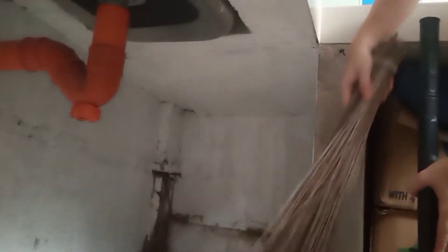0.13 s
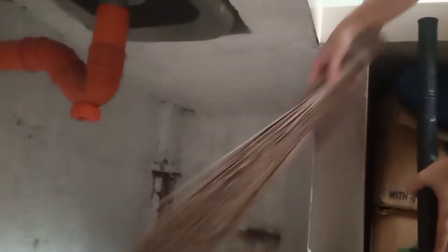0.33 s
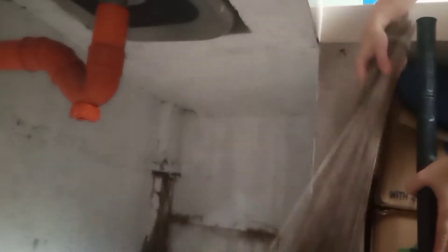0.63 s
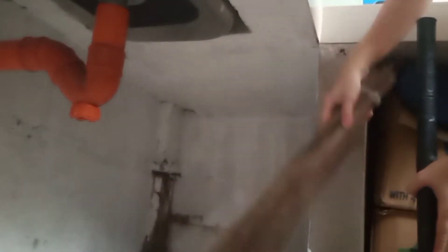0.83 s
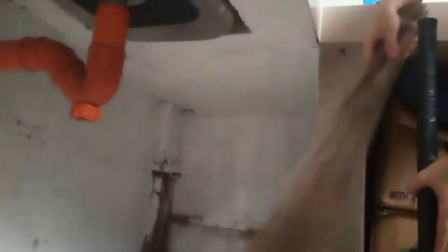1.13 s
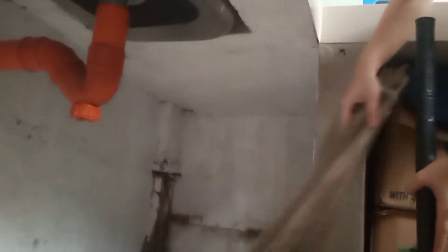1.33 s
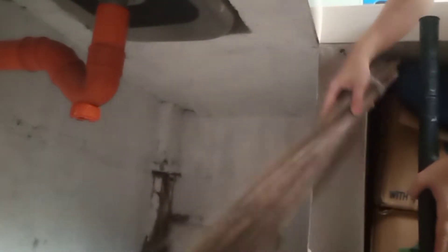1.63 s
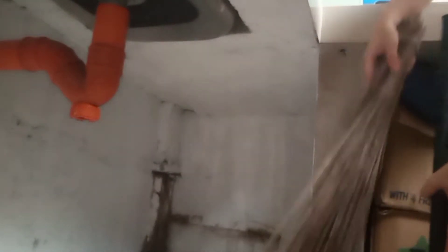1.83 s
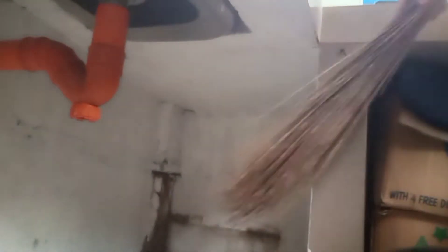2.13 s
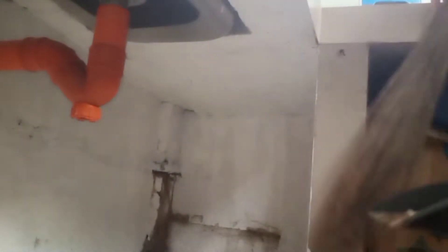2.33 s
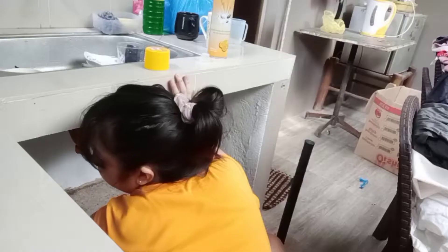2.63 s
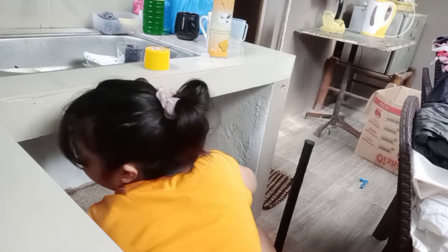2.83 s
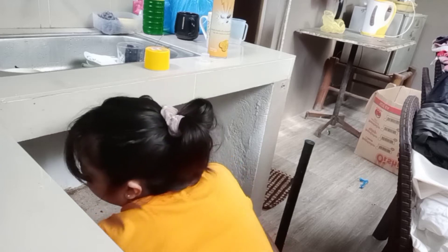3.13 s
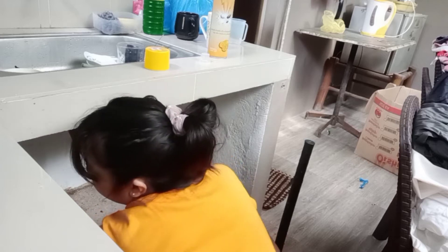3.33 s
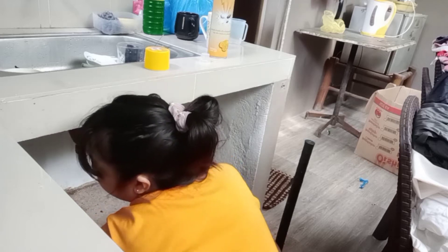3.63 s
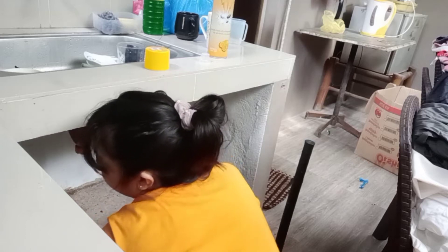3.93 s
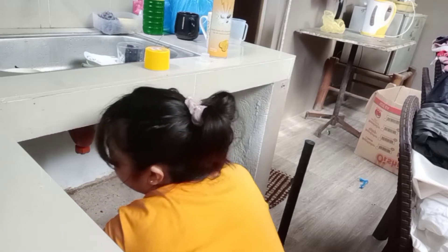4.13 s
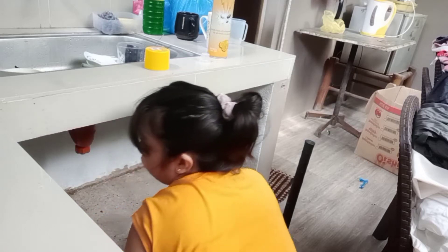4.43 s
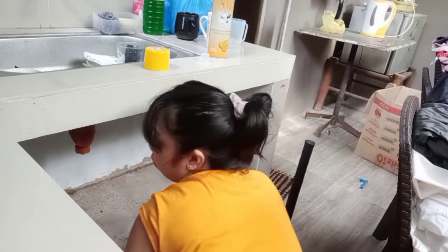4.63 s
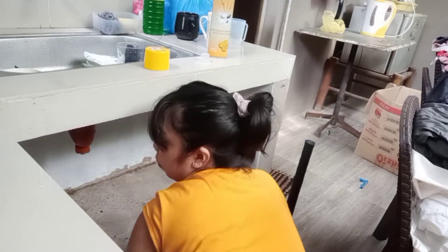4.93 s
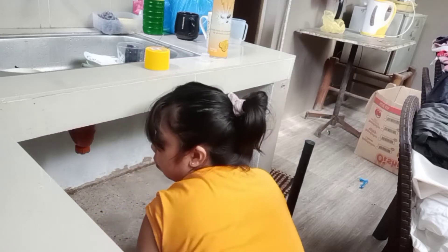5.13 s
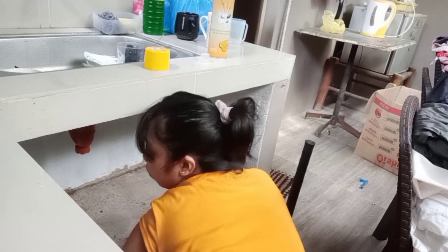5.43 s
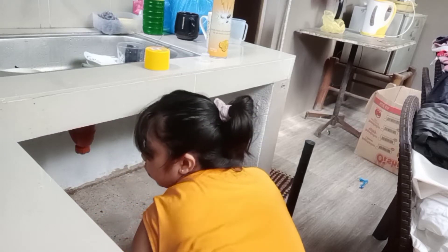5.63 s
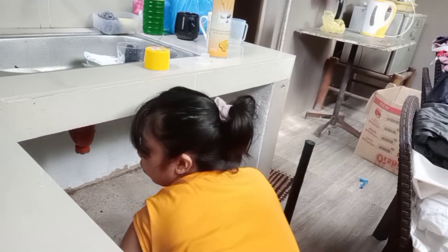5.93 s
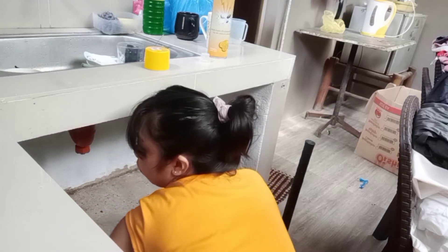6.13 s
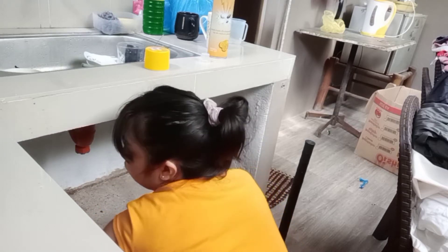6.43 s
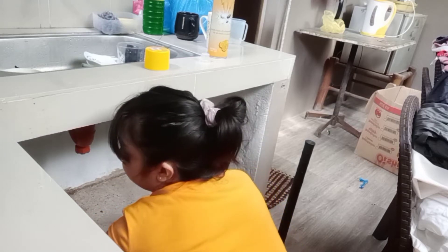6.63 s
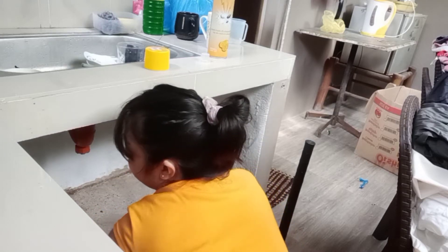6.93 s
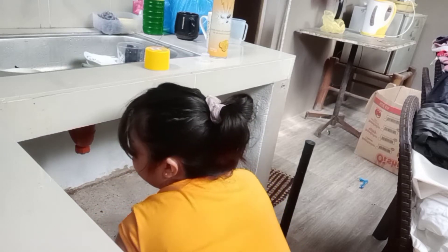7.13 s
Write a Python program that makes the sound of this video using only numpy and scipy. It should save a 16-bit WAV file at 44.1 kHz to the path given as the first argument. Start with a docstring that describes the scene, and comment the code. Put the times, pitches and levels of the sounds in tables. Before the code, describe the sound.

Brisk sweeping on gritty concrete: dense sprays of dry rib tips, each swelling fast and letting go sharply. The first strokes are close to the microphone in a resonant niche, with dull thumps and short hums. A pause of soft droning and shuffling ends in an abrupt cut; then softer, uneven strokes continue from a step away in the kitchen, the scratching spread wide in stereo.

```python
"""A broom of stiff palm ribs sweeps rough concrete under a kitchen sink, over a faint murmur of house and street.
At first the strokes are close by, inside the niche: each is a dense spray of rib tips catching on grit.
The hollow under the counter resonates, humming and droning when it is bumped or rubbed.
Then the sound drops out briefly as the listening place changes.
From there the strokes go on, heard from a step away and with less of the niche in them."""
import sys
import numpy as np
from scipy import signal
from scipy.fft import rfft, irfft, next_fast_len
from scipy.io import wavfile
from scipy.ndimage import uniform_filter1d, map_coordinates

SR = 44100
rng = np.random.default_rng(int(sys.argv[2]) if len(sys.argv) > 2 else 0)


def dump(signal):
    """Clip the signal to [-1, 1] and save it as 16-bit WAV at the path in sys.argv[1]."""
    limited = np.clip(np.atleast_2d(signal).T, -1, 1)
    pcm = np.round(limited * 32767).astype(np.int16)
    wavfile.write(sys.argv[1], SR, pcm)


N = 321930  # samples

# In every noise spectrum only the shape counts, since the noise is brought to rms 1 afterwards.
# Room tone spectrum: f/Hz, density/dB per Hz
ROOM_SPECTRUM = [(25, -20), (136, -12), (278, -2.5), (400, -2), (612, -4.5), (760, -5.5), (1400, -26),
                 (3000, -31), (5500, -45), (8000, -3.5), (10000, -33.5), (16000, -37)]
# Room tone strength, around which it wavers: t/s, level/dB
ROOM_LEVEL = [(0, -55.5), (1.3, -65), (1.95, -68), (2.5, -69), (2.65, -69.5), (7.3, -75)]

# Hums of the hollow or things in it, bumped and dragged; hum() extends the length and broadens the width:
# t/s, length/s, f/Hz, width/Hz, level/dB
HUMS = [(0, 0.19, 66, 11, -50), (.01, 0.12, 233.4, 35, -49), (0.171, 0.047, 935, 15, -47),
        (.19, .1, 187.4, 12, -53.5), (.22, .075, 98.5, 8.8, -47), (.24, 0.22, 890, 90, -56.5),
        (.17, .18, 1900, 90, -54), (.52, 0.12, 414, 40.5, -52), (.63, 0.21, 105, 9.5, -55),
        (0.781, 0.13, 75, 15, -52.5), (1.019, 0.095, 68, 17, -49.5), (1.269, 0.14, 240, 72, -43.5),
        (1.37, .15, 247, 30, -46.5), (.97, .07, 480, 110, -53.5), (1.45, .16, 188, 11, -59.5),
        (1.612, 0.1, 117.7, 24, -45.5), (2.157, .06, 328, 300, -55.5), (2.13, 0.055, 940, 17, -69),
        (2.27, .06, 977, 10, -69), (2.66, 0.15, 125, 56, -47.5), (3.01, .21, 148.3, 53, -54),
        (4.23, 0.16, 113, 17.6, -47.5), (4.42, 0.071, 135.4, 31, -49.5), (4.561, .12, 100.7, 17, -57.5),
        (5.281, 0.1, 91.98, 15, -60.5), (6.021, 0.048, 112, 11, -57.5), (6.136, 0.064, 156, 14, -55.5),
        (6.239, 0.24, 604, 81, -69.5), (7.054, 0.1, 106, 39.4, -55), (7.23, 0.053, 116, 20, -58)]
# Resonances sounded together by one long drag: f/Hz, level/dB
DRONE = [(186.2, -51.5), (271.5, -66), (356.4, -71.5), (580, -72)]
# Broad rumble under the hums, around which it wavers: t/s, level/dB
RUMBLE_LEVEL = [(0, -48), (.3, -56.5), (.9, -56.5), (1.25, -65.5), (1.35, -54), (1.8, -56), (2, -76),
                (2.1, -59), (2.5, -61), (2.75, -50), (2.95, -62.5), (3.2, -55), (3.9, -60), (4.6, -56.5),
                (5.25, -67.5), (5.5, -61), (7.3, -60)]
# Rumble spectrum: f/Hz, density/dB per Hz
RUMBLE_SPECTRUM = [(20, -10.5), (60, -4.0), (110, -0.5), (170, 0.0), (260, -14.5), (400, -16.5), (900, -27)]

# Strokes that land: touch t/s, nominal landing level/dB, level at touch/dB, peak t/s, peak level/dB,
# lift t/s, level at lift/dB, release rate/(dB/s), trailing ribs level/dB, scrape relative to scratch/dB
STROKES = [(-.03, -40, -24.5, .036, -22.5, .12, -26.5, 184, -38.5, -15),
           (0.357, -15, -27.5, .46, -22, 0.54, -23, 172, -40, -17.5),
           (0.7787, -25, -30.5, .894, -22.5, 0.99, -23, 184, -41, -15),
           (1.225, -13, -36, 1.32, -21.5, 1.385, -23.5, 220, -47, -21),
           (1.6312, -14.5, -32, 1.667, -22, 1.763, -29.5, 225, -56, -22),
           (2.641, -37.5, -48, 2.688, -28, 2.704, -30, 130, -55, -20.5),
           (2.9663, -24, -44.5, 3.03, -30.5, 3.14, -30, 227, -54, -22.5),
           (3.2754, -23, -44, 3.386, -29.5, 3.395, -30, 160, -55, -21),
           (3.6466, -16, -41, 3.718, -29, 3.81, -36.5, 150, -55, -18),
           (4.137, -23, -43, 4.248, -29, 4.333, -37.5, 183, -52, -17.5),
           (4.5279, -25, -40.5, 4.644, -29.5, 4.7, -31, 188, -47, -19),
           (4.8816, -27, -39.5, 5.001, -28, 5.056, -33, 235, -46, -17.5),
           (5.2315, -24, -36.5, 5.3, -39, 5.38, -40, 200, -55, -20),
           (5.696, -26, -43.5, 5.822, -28.5, 5.878, -28.5, 186, -66, -20.5),
           (6.0905, -26, -42.5, 6.189, -31, 6.27, -32.5, 178, -56, -21),
           (6.4103, -28.5, -45, 6.485, -35, 6.58, -28.5, 163, -52, -20),
           (6.9622, -25, -39, 7, -37, 6.99, -36, 200, -55, -21)]
# Pushes with the ribs already brushing: peak t/s, peak level/dB, lift t/s, level at lift/dB,
# release rate/(dB/s), trailing ribs level/dB, scrape relative to scratch/dB
PUSHES = [(.765, -49, 0.82, -48, 200, -70, -11), (1.195, -52, 1.2, -53, 198, -70, -22),
          (1.565, -52, 1.56, -53, 200, -70, -20), (1.61, -44.5, 1.64, -41.5, 200, -70, -23),
          (4.505, -59, 4.525, -52, 200, -70, -27), (6.95, -58.5, 5.9, -57, 200, -67, -13),
          (2.87, -35, 2.87, -37.5, 332, -49, -22), (3.5, -35.5, 3.51, -36.5, 180, -57, -29),
          (3.87, -37.5, 3.94, -37, 193, -56, -24), (5.405, -29, 5.497, -29, 160, -54, -17.5),
          (6.71, -39, 6.756, -38, 170, -63, -14), (7.065, -31, 7.187, -34, 214, -60, -17.5)]
# Ribs snapping free: t/s, nominal level/dB
SNAPS = [(1.265, -15), (2.254, -32), (2.3999, -47), (2.6644, -12.5), (3.6955, -22.5)]
# Faint shuffle of the lifted broom: t/s, scratch level/dB, sizzle relative to scratch/dB
SHUFFLE = [(1.95, -87, -18), (2.06, -69, -20), (2.134, -68, -21), (2.186, -55.5, -24), (2.278, -57, 3),
           (2.318, -67, -22), (2.45, -67.5, -21.5), (2.52, -74, -20)]
# Spectra of scratching tips, the niche's addition to them, scraping bundle, sizzle: f/Hz, density/dB per Hz
SCRATCH_SPECTRUM = [(700, -49), (1100, -20.5), (1600, -9.5), (2200, -6), (3500, -0.5), (5200, -5.5),
                    (7000, -5.5), (9200, -4.5), (10200, -7), (11000, -45)]
NICHE_SPECTRUM = [(1000, -29.5), (1400, -5.5), (1700, -1.5), (2100, -4.5), (2800, -43.5)]
SCRAPE_SPECTRUM = [(400, -34), (700, -15), (850, -8.5), (1050, -6.5), (1300, -3.5), (1700, -6),
                   (2300, -43.5)]
SIZZLE_SPECTRUM = [(8800, -44.5), (9800, -3), (10800, 2), (12500, 1), (14500, -2), (16000, -10.5)]

# Similarity of left and right: f/Hz, correlation (1 = the same)
LIKENESS = [(60, .93), (200, 0.92), (400, 0.82), (700, 0.44), (1400, 0.051), (3000, 0.015)]
# Balance of the two ports: f/Hz, left minus right level/dB
BALANCE = [(60, 0), (200, -2), (640, 0.5), (1400, 0), (4000, 1), (6500, 1.5), (8200, -2), (10000, -0.5),
           (12500, 2.5), (15500, 6)]
# Resonances of the ports: f/Hz, width/Hz, level/dB
PORT_RESONANCES = [(7974, 1180, 5.5), (14970, 1360, 5.5)]
# Dropout between the two listening places: t/s, level/dB
DROPOUT = [(2.505, -0.5), (2.545, -18), (2.6, -26.5), (2.61, -60), (2.625, -54), (2.63, -18), (2.645, 0)]

BACK_S = 2.62  # the listening place changes
# pairs: inside the niche, a step away
NICHE_DB = (-13, -33)  # relative to the scratch
TRAIL_SCRAPE_DB, TRAIL_SIZZLE_DB = (-7.5, -39), (-9.5, -3)  # relative to the trailing scratch
SCRAPE_BUILDS_DB = (8.5, 3.5)  # the scrape is weaker by this until BUILD_S before the lift
BUILD_S = 0.18
LEAD_S, ATTACK_S = 0.017, 0.0077  # the scratch starts before the landing and is fully open after it
RISE_BEND = 0.82  # under 1: the swell to the peak is quickest at first
PUSH_DB_PER_S, TRAIL_DB_PER_S = 222, 82  # rise of a push, decay of the trailing ribs
SCRAPE_GROWS = 0.23  # extra dB of scrape per dB of scratch
SIZZLE_DB, SHUFFLE_SCRAPE_DB = -3, -5  # relative to the scratch
DRONE_S, DRONE_LENGTH_S, DRONE_WIDTH_HZ = 2.06, 0.47, 9.6  # length and width go through hum() too
SLIDE_S, SLIDE_LENGTH_S, SLIDE_WIDTH_HZ, SLIDE_DB = 0.86, 0.2, 260, -45
SLIDE_FROM_HZ, SLIDE_TO_HZ = 1000, 596
STEADY_UNDER_HZ = 30  # hums much wider than this lose their steady tone
SWELL_S, SWELL_SHARE = 0.032, 0.14  # a hum swells and fades over this time plus this share of its length
RUMBLE_WAVERS_DB, ROOM_WAVERS_DB = 2, 4.4
TOP_HZ = 15750  # middle of the band edge


def amp(db):
    """A level in dB is twenty times the logarithm of the amplitude ratio returned here."""
    return 10 ** (np.asarray(db) / 20)


def unit(x):
    """Dividing a signal by its root mean square gives it rms 1."""
    return x / np.sqrt(np.mean(np.abs(x) ** 2) + 1e-20)


def along(points, hz):
    """Pitch is logarithmic in frequency, so values are interpolated on a log axis."""
    f, values = np.transpose(points)
    return np.interp(np.log(hz + 1), np.log(f + 1), values)


def curves(rows):
    """An envelope follows its knots linearly: one value per sample for each column after the time."""
    knot_s, *columns = np.transpose(rows)
    return [np.interp(np.arange(N) / SR, knot_s, column) for column in columns]


def wobble(rate):
    """Spline through random knots, rate of them a second: a fluctuation limited in speed."""
    knots = rng.standard_normal(int(N * rate / SR) + 4)
    return map_coordinates(knots, [np.arange(N) * rate / SR])


def placed(pair):
    """The listening place selects the first value inside the niche, the second a step away."""
    return np.where(np.arange(N) / SR < BACK_S, pair[0], pair[1])


def filtered(x, response):
    """A linear filter multiplies the spectrum by a complex response of frequency."""
    m = next_fast_len(N + SR // 2)  # zero padding leaves room for ringing
    return irfft(rfft(x, m) * response(np.fft.rfftfreq(m, 1 / SR)), m)[..., :N]


def spread(pair, spectrum):
    """Sum and difference of two unrelated noises set the left-right correlation, high in the bass only; rms 1."""
    def mid_side(hz):
        angle = np.arccos(np.clip(along(LIKENESS, hz), -1, 1)) / 2
        return amp(along(spectrum, hz)) * [np.cos(angle), np.sin(angle)]

    mid, side = filtered(pair, mid_side)
    return unit(np.array([mid + side, mid - side]))


def patchy(pair, depth_db, drift_db=0):
    """Noise modulated in time and frequency: strength varies in small patches, colour drifts in broad ones."""
    z = signal.stft(pair, nperseg=2048)[2]

    def patches(bins, frames):
        grid = uniform_filter1d(rng.standard_normal(z.shape[1:]), size=bins, axis=0)
        return unit(uniform_filter1d(grid, size=frames, axis=1))

    gain_db = depth_db * patches(3, 3) + drift_db * patches(50, 3)
    return signal.istft(z * amp(gain_db), nperseg=2048)[1][:, :N]


def room():
    """Background noise, coloured and slowly wavering: the faint murmur of the house and street, with a thin
    hiss near 8 kHz."""
    level_db, = curves(ROOM_LEVEL)
    murmur = spread(patchy(rng.standard_normal((2, N)), depth_db=3), ROOM_SPECTRUM)
    return amp(level_db + ROOM_WAVERS_DB * wobble(6)) * murmur


def hum(s, length, hz, width_hz, db, end_hz=None):
    """Resonance driven by rough rubbing: a tone that wavers in strength and phase, the faster the wider it is."""
    t = np.arange(round((length + 0.05) * SR)) / SR
    rate = width_hz + 12 + hz / 20  # wavering knots per second
    re, im, side = [map_coordinates(k, [t * rate]) for k in rng.standard_normal((3, 250))]
    phase = 2 * np.pi * np.cumsum(np.linspace(hz, end_hz or hz, len(t))) / SR
    steady = 1.5 * np.exp(-(width_hz / STEADY_UNDER_HZ) ** 2)
    wavering = unit(steady + re + 1j * im)
    tone = np.real(wavering * np.exp(1j * phase)) * np.sqrt(2)
    # higher hums differ more between the ports
    apart = np.clip(0.2 + hz / 900, 0, 1) * side * np.sin(phase)
    from_ends = np.minimum(t, t[-1] - t)
    swell = np.sin(np.pi / 2 * np.clip(from_ends / (SWELL_S + SWELL_SHARE * length), 0, 1)) ** 2
    start = round(max(s - 0.02, 0) * SR)
    return start, amp(db) * swell * np.array([tone + apart, tone - apart])


def hollow():
    """Cavity resonances superpose: short hums, one long drone and a scrape sliding down, over a broad rumble."""
    sounds = [hum(*row) for row in HUMS]
    sounds += [hum(DRONE_S, DRONE_LENGTH_S, hz, DRONE_WIDTH_HZ, db) for hz, db in DRONE]
    sounds.append(hum(SLIDE_S, SLIDE_LENGTH_S, SLIDE_FROM_HZ, SLIDE_WIDTH_HZ, SLIDE_DB, end_hz=SLIDE_TO_HZ))
    hums = np.zeros((2, N + SR))
    for start, sound in sounds:
        hums[:, start:start + sound.shape[1]] += sound
    level_db, = curves(RUMBLE_LEVEL)
    rumble = spread(patchy(rng.standard_normal((2, N)), depth_db=4.5), RUMBLE_SPECTRUM)
    return hums[:, :N] + amp(level_db + RUMBLE_WAVERS_DB * wobble(10)) * rumble


def pressure():
    """Powers of independent contacts add: strokes swell, hold and let go, and a few ribs trail after each."""
    t = np.arange(N) / SR
    rises = []
    for touch, _, touch_db, peak, peak_db, *rest in STROKES:
        progress = np.clip((t - touch) / (peak - touch), 0, 1)
        rise_db = touch_db + (peak_db - touch_db) * progress ** RISE_BEND
        gate = np.clip((t - touch + LEAD_S) / (LEAD_S + ATTACK_S), 0, 1) ** 2
        rises.append((rise_db, gate, peak, peak_db, *rest))
    for peak, peak_db, *rest in PUSHES:
        rise_db = peak_db - PUSH_DB_PER_S * np.maximum(peak - t, 0)
        rises.append((rise_db, 1, peak, peak_db, *rest))

    # the shuffle is heard only before the place changes
    shuffle_db, airy_db = curves(SHUFFLE)
    shuffle = amp([shuffle_db, shuffle_db + SHUFFLE_SCRAPE_DB, shuffle_db + airy_db])
    power = (placed((1, 0)) * shuffle) ** 2  # rows: scratch, scrape, sizzle
    trail_scrape, trail_sizzle = amp(placed(TRAIL_SCRAPE_DB)), amp(placed(TRAIL_SIZZLE_DB))
    builds_db = placed(SCRAPE_BUILDS_DB)
    for rise_db, gate, peak, peak_db, lift, lift_db, release, trail_db, scrape_db in rises:
        after = np.maximum(t - lift, 0)
        hold_db = np.interp(t, [peak, lift], [0, lift_db - peak_db])
        db = rise_db + hold_db - release * after
        main = gate * amp(db)
        trail = (t > lift) * amp(trail_db - TRAIL_DB_PER_S * after)
        # the bundle bears down through the stroke
        unbuilt_db = builds_db * np.clip((lift - t) / BUILD_S, 0, 1)
        scrape = main * amp(scrape_db + SCRAPE_GROWS * (db - peak_db) - unbuilt_db)
        power[0] += main ** 2 + trail ** 2
        power[1] += scrape ** 2 + (trail * trail_scrape) ** 2
        power[2] += (main * amp(SIZZLE_DB)) ** 2 + (trail * trail_sizzle) ** 2
    return np.sqrt(power)


def catches(spike_db, clump_db):
    """Stick-slip of rib tips on grit: a tiny click at every instant, of uneven size, in clumps."""
    uneven = np.clip(rng.standard_normal((2, N)), -2, 2)
    clumps = wobble(170) + wobble(40)
    return amp(spike_db * uneven + clump_db * clumps) * rng.standard_normal((2, N))


def bursts():
    """Impulsive contact and release: landings and snaps are decaying noise bursts, high-passed at 1500 Hz."""
    out, t = np.zeros((2, N + SR)), np.arange(SR // 20) / SR
    landings = [row[:2] for row in STROKES if row[0] >= 0]
    for s, db in SNAPS + landings:
        # falls 60 dB in 63 ms, after an onset of 2.5 ms
        envelope = amp(db - 11.5 - 60 * t / 0.063) * (1 - np.exp(-t / 0.0025))
        start = round(s * SR)
        out[:, start:start + len(t)] += envelope * rng.standard_normal((2, len(t)))
    return filtered(out[:, :N], lambda hz: (1j * hz / 1500 / (1 + 1j * hz / 1500)) ** 2)


def broom():
    """Friction noise in bands: tips scratch and sizzle, the pressed bundle scrapes lower, bursts add clicks."""
    scratch_gain, scrape_gain, sizzle_gain = pressure()
    tips = catches(spike_db=2.5, clump_db=0.37)
    scratch = spread(patchy(tips, depth_db=2.5, drift_db=0.85), SCRATCH_SPECTRUM)
    niche = spread(patchy(catches(spike_db=5, clump_db=0), depth_db=1), NICHE_SPECTRUM)
    scrape = spread(patchy(catches(spike_db=3, clump_db=2.5), depth_db=4), SCRAPE_SPECTRUM)
    sizzle = spread(patchy(catches(spike_db=6.5, clump_db=-1.34), depth_db=0), SIZZLE_SPECTRUM)
    scratch_in_place = scratch + amp(placed(NICHE_DB)) * niche
    return scratch_gain * scratch_in_place + scrape_gain * scrape + sizzle_gain * sizzle + bursts()


def scene():
    """Sound pressures superpose: room, hollow and broom together drop out where the place changes."""
    dropout_db, = curves(DROPOUT)
    return amp(dropout_db) * (room() + hollow() + broom())


def record(dry):
    """Two ports act as linear filters: resonances lift bands, balance leans with frequency, the top is cut."""
    def response(f):
        ports = 1 + sum(amp(db) * 1j * f * width / (centre * centre - f * f + 1j * f * width)
                        for centre, width, db in PORT_RESONANCES)
        lean = amp(np.outer([0.5, -0.5], along(BALANCE, f)))
        edge = np.sin(np.pi / 2 * np.clip((TOP_HZ - f) / 250 + 0.5, 0, 1)) ** 2  # 250 Hz wide
        return ports * lean * edge

    return filtered(dry, response)


dry = scene()
out = record(dry)
dump(out)
```